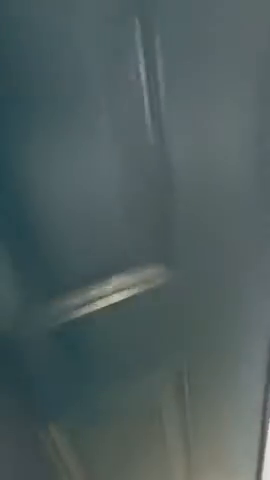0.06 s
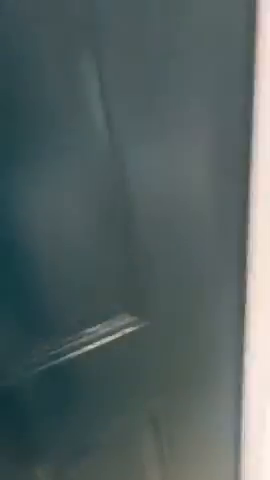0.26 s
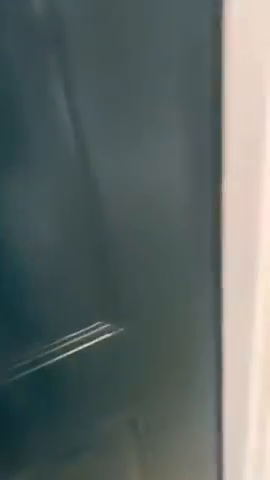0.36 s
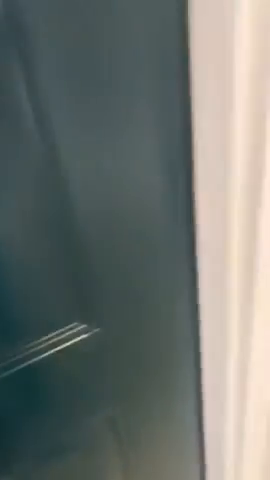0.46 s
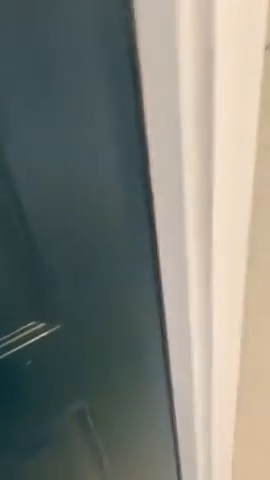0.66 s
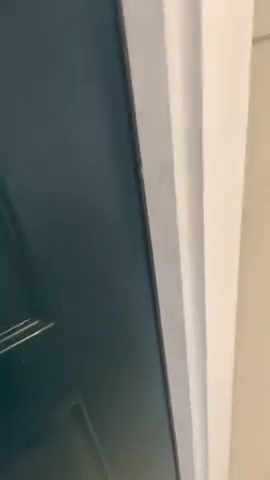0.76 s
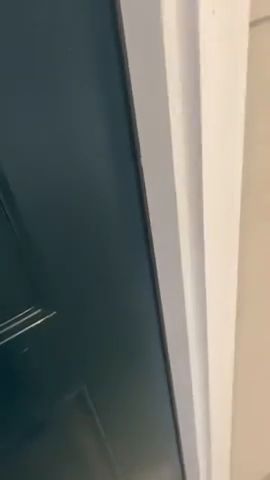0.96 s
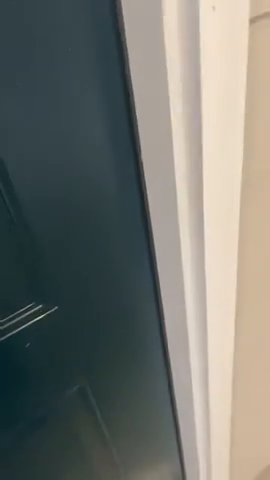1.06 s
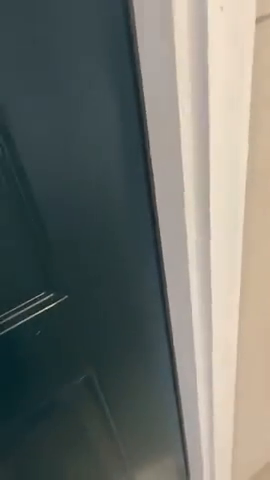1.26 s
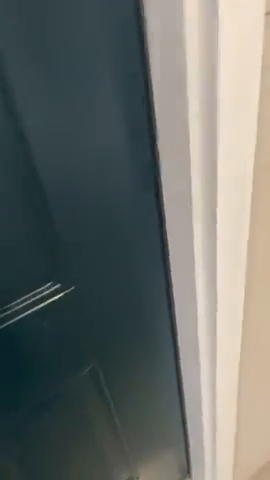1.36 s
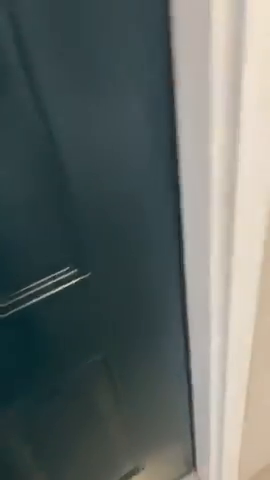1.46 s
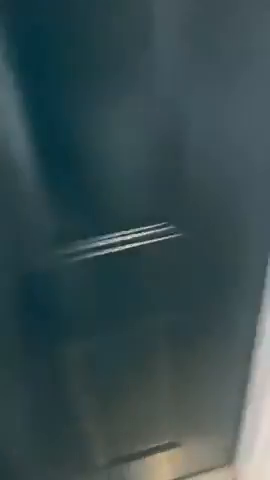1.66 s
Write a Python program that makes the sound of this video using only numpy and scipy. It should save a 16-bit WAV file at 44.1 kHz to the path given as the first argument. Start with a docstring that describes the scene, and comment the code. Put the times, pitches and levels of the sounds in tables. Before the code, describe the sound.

Knuckles rap a door five times, close to a mono microphone in an echoing hallway. Knocks fall at about 0.2, 0.36, 0.63, 0.77 and 1.04 seconds, uneven in spacing; the first is dullest, the last sharpest. Each has a boomy woody thud, a crack and a small metallic latch rattle. The ring fades over low, steady air noise, with faint soft bumps near 1.53 and 1.68.

```python
"""Five quick knuckle raps on an apartment door, heard from close by in a hallway.
Each rap sums noise bursts (tick, crack) with a filtered thud, its echoes and dying sines of the panel.
Longer, brighter noise bursts make the latch chatter; decaying noise makes the hallway ring on.
Behind them: two stretches of faint hiss, two soft sine bumps and steady shaped air noise."""
import sys
import numpy as np
from scipy import signal
from scipy.fft import rfft, irfft
from scipy.io import wavfile

SR = 44100
rng = np.random.default_rng(int(sys.argv[2]) if len(sys.argv) > 2 else 0)


def log_audio(samples):
    """Write samples as a 16-bit WAV file to the path given in sys.argv[1]."""
    # one column per channel
    frames = np.atleast_2d(samples).T
    # limit to full scale, then quantise
    limited = np.clip(frames, -1, 1)
    pcm = np.round(limited * 32767).astype(np.int16)
    wavfile.write(sys.argv[1], SR, pcm)


N = 74970


def amp(db):
    """Decibels to amplitude."""
    return 10 ** (np.asarray(db) / 20)


def read(points, hz):
    """A curve joined by straight lines over log frequency."""
    f, value = np.transpose(points)
    return np.interp(np.log(hz + 1), np.log(f + 1), value)


def unit(x):
    """Scales to energy 1."""
    return x / np.sqrt(np.sum(x ** 2) + 1e-20)


def add(mix, start_s, sound):
    """Mixes a sound in place, cut at the end of the mix."""
    part = mix[round(start_s * SR):][:len(sound)]
    part += sound[:len(part)]


def through(x, response):
    """Convolution cut to the scene's length."""
    return signal.fftconvolve(x, response)[:N]


def knocks():
    """Knuckles tick on the paint and crack on the door's skin; the whole panel follows."""
    # Each row: start in seconds, strength in dB, gain of crack and skin in dB, gain of tick in dB.
    blows = [(0.2064, -2.5, -14.5, 0), (.3615, .5, -1, -4), (0.6261, -.5, -2, -0.5),
             (0.7738, -2, -8.5, -3.5), (1.0374, 0, 2.5, 5)]
    # Each row: frequency in Hz, crack level in dB.
    crack_spectrum = [(200, -0.5), (500, 9.5), (750, -1.5), (950, -2), (1400, 2), (1900, -13), (2600, -23),
                      (4000, -32), (16000, -46)]
    # Each row: frequency in Hz, tick level in dB.
    tick_spectrum = [(500, 13), (1500, 11), (2400, 3.5), (3500, -9.5), (4400, -4), (7000, -14),
                     (10000, -20.5), (16000, -28)]
    crack_level_db, tick_level_db = 2.5, -12.5
    soft_hz, soft_share = 514, 0.36  # a soft knuckle wakes less of the panel above soft_hz

    out = np.zeros(N)
    body = panel()
    skin_ring = skin()
    lowpass = signal.butter(4, soft_hz, fs=SR, output="sos")
    low = signal.sosfiltfilt(lowpass, body)
    high = body - low
    for start_s, strength_db, crack_db, tick_db in blows:
        crack, tick = np.zeros((2, N))
        add(crack, 0, amp(crack_level_db) * burst(crack_spectrum, decay_s=0.016))
        add(tick, 0, burst(tick_spectrum, decay_s=0.055))
        crack_in_hall = hallway(crack, early_db=-4, late_db=-7)
        tick_in_hall = hallway(tick, early_db=4, late_db=1.5)
        add(out, start_s, amp(strength_db) * (low + amp(soft_share * crack_db) * high))
        add(out, start_s, amp(crack_db) * clack())
        add(out, start_s, amp(crack_db) * (skin_ring + crack_in_hall))
        add(out, start_s, amp(tick_level_db + tick_db) * tick_in_hall)
    return out


def burst(spectrum, decay_s):
    """Short impact: decaying noise forced to the spectrum, decayed again, softened by contact rise."""
    contact_s = 0.00044
    t = np.arange(SR // 10) / SR
    hz = np.fft.rfftfreq(len(t), 1 / SR)
    z = rfft(rng.standard_normal(len(t)) * amp(-60 * t / decay_s))
    phase = z / (abs(z) + 1e-9)
    shaped = irfft(phase * amp(read(spectrum, hz)), len(t))
    rise = 1 - np.exp(-(t / contact_s) ** 2)
    return unit(shaped * amp(-20 * t / decay_s) * rise)


def panel():
    """The door's answer to one blow: a thud, its echoes, the modes and a low boom."""
    # Each row: delay in seconds, signed share of the dulled thud.
    echoes = [(0.0093, 0.15), (0.0148, 0.072), (0.0189, 0.08), (0.0255, 0.17), (0.0281, 0.27),
              (0.0305, -0.16), (0.0426, 0.38), (0.052, -0.12), (0.0702, 0.14)]
    # Door modes. Each row: frequency in Hz, level in dB, T60 in seconds.
    door_modes = [(55.93, -21.5, 0.31), (77.3, -32, 0.57), (101, -20, 0.19), (118.8, -19.5, 0.18),
                  (137.7, -22.5, 0.34), (202.3, -19, 0.4), (232.1, -30.5, 0.63), (381, -24.5, 0.45),
                  (412.3, -33, 0.48), (512, -24.5, 0.24), (547, -31.5, 0.31), (645, -38, 0.44),
                  (761.6, -41, 0.41), (816.6, -29, 0.16)]
    # Hallway standing waves. Each row: frequency in Hz, level in dB, T60 in seconds.
    standing_waves = [(173.5, -30, 0.67), (220.3, -40.5, 1.18), (257.3, -36.5, 1.46), (269.4, -30.5, 0.73),
                      (292.8, -32, 0.98), (307.4, -37, 1.02), (320.8, -26.5, 0.67), (343.8, -29.5, 0.59)]
    # Each row: frequency in Hz, boom level in dB.
    boom_spectrum = [(50, -23), (150, -33), (220, -12), (300, -0.5), (400, 4), (480, 1.5), (700, -2.5),
                     (1000, -9), (2000, -42)]
    delay_s = 0.006  # blow to thud centre
    echo_cutoff_hz, boom_db = 600, 0

    pulse = thud(delay_s)
    dull = signal.sosfilt(signal.butter(1, echo_cutoff_hz, fs=SR, output="sos"), pulse)
    out = np.zeros(N)
    add(out, 0, pulse)
    for echo_s, share in echoes:
        add(out, echo_s, share * dull)
    modes = ring(door_modes, rise_s=0.0012) + ring(standing_waves, rise_s=0.028)
    add(out, delay_s, modes)
    boom = unit(through(tail(), colour(boom_spectrum)))
    add(out, delay_s, amp(boom_db) * boom)
    return out


def thud(delay_s):
    """The panel's first push: a zero-phase pulse of set spectrum under a Gaussian window."""
    # Each row: frequency in Hz, level in dB before windowing.
    thud_spectrum = [(40, -45), (110, -12), (200, 1), (300, 12.5), (450, -11.5), (680, 0.5), (950, -30.5),
                     (1400, -23), (2200, -62), (5000, -85)]
    peak_db, sigma_s = -2, 0.0063
    t = np.arange(SR // 10) / SR
    hz = np.fft.rfftfreq(len(t), 1 / SR)
    shift = np.exp(-2j * np.pi * hz * delay_s)
    pulse = irfft(amp(read(thud_spectrum, hz)) * shift, len(t))
    pulse *= np.exp(-((t - delay_s) / sigma_s) ** 2 / 2)
    pulse *= np.minimum(2 * t / delay_s, 1)
    return pulse * amp(peak_db) / abs(pulse).max()


def ring(modes, rise_s):
    """Exponentially dying sines with a common build-up."""
    t = np.arange(N) / SR
    rise = 1 - np.exp(-t / rise_s)
    return rise * sum(amp(db - 60 * t / t60_s) * np.cos(2 * np.pi * hz * t) for hz, db, t60_s in modes)


def skin():
    """Upper modes of the door's skin, louder under hard knuckles."""
    # Each row: frequency in Hz, level in dB, T60 in seconds.
    skin_modes = [(438.5, -36.5, 0.24), (607, -53, 0.15), (689.5, -42.5, 0.53), (764, -44, 0.38),
                  (1053.6, -34.5, 0.29), (1061, -37.5, 0.15), (1190, -39, 0.23), (1295, -44, 0.68),
                  (1327, -52, .45), (1328, -46.5, 1), (1455, -46, .45), (1564, -47, .3), (2650, -68, .4),
                  (4300, -52, 0.34)]
    return ring(skin_modes, rise_s=0.0042)


def clack():
    """A few cycles of the door's skin under a Gaussian, just after the contact."""
    hz, peak_db, delay_s, width_s = 1408, -17, 0.00525, 0.0018
    t = np.arange(SR // 20) / SR - delay_s
    return amp(peak_db) * np.exp(-(t / width_s) ** 2) * np.sin(2 * np.pi * hz * t)


def latch():
    """The bolt clacks against its plate as the door springs back."""
    # Each row: start in seconds, relative level in dB.
    rattles = [(0.2152, -8.5), (0.2415, -15), (0.2606, -12.5), (.3740, 1), (.3935, -20), (0.637, 0),
               (0.6561, -5), (0.683, -8.5), (0.7841, 0.5), (0.8333, -9.5), (1.0495, -10), (1.0730, -6)]
    # Each row: frequency in Hz, level in dB.
    latch_spectrum = [(600, -17), (2000, 4.5), (2900, 4), (3700, -3), (5000, -5), (6000, 4), (7200, 1),
                      (8500, -11), (11000, -18.5), (16000, -29)]
    level_db = -12
    out = np.zeros(N)
    for start_s, db in rattles:
        add(out, start_s, amp(level_db + db) * burst(latch_spectrum, decay_s=0.07))
    return hallway(out, early_db=-13, late_db=-5)


def hallway(x, early_db, late_db):
    """A sound with its quick scatter from the doorway and the long ring of the hallway."""
    early_t60_s, rise_s = 0.18, 0.0046
    t = np.arange(N) / SR
    rise = 1 - np.exp(-t / rise_s)
    early = unit(rng.standard_normal(N) * amp(-60 * t / early_t60_s) * rise)
    return x + through(x, amp(early_db) * early + amp(late_db) * tail())


def tail():
    """Diffuse reflections: random signs that build up, then die band by band."""
    # Each row: frequency in Hz, T60 in seconds.
    decay = [(60, 1), (150, 1), (290, 0.62), (500, 0.45), (900, 0.73), (1400, 0.92), (2500, 0.72),
             (6500, 0.46), (14000, 0.26)]
    rise_s = 0.0046
    hz, t, z = signal.stft(rng.choice([-1., 1.], N), SR, nperseg=256)
    t60_s = read(decay, hz)[:, None]
    x = signal.istft(z * amp(-60 * t / t60_s), SR, nperseg=256)[1][:N]
    return unit(x * (1 - np.exp(-np.arange(N) / SR / rise_s)))


def colour(spectrum):
    """Minimum-phase pulse: the most compact causal one with this spectrum."""
    hz = abs(np.fft.fftfreq(8192, 1 / SR))
    log_gain = np.log(amp(read(spectrum, hz)))
    response = np.exp(np.conj(signal.hilbert(log_gain)))
    return unit(np.fft.ifft(response).real[:len(log_gain) // 2])


def faint_hiss():
    """A faint band of filtered noise, raised around the first knock and again after the last."""
    # Each row: start in seconds, end in seconds, RMS level in dB.
    stretches = [(0, 0.336, -67), (1.244, 1.49, -66.5)]
    fade_in_s, fade_out_s = 0.0092, 0.03
    t = np.arange(N) / SR
    band = signal.butter(1, [3500, 10000], "bandpass", fs=SR, output="sos")
    hiss = signal.sosfilt(band, rng.standard_normal(N))
    level = np.zeros(N)
    for start_s, end_s, db in stretches:
        fade_in = np.clip((t - start_s) / fade_in_s, 0, 1)
        fade_out = np.clip((end_s - t) / fade_out_s, 0, 1)
        level += amp(db) * fade_in * fade_out
    return hiss / hiss.std() * level


def bumps():
    # Each row: centre in seconds, frequency in Hz, level in dB, 1/e half-width in seconds.
    soft_bumps = [(1.533, 675, -43.5, 0.0043), (1.680, 319, -41.5, 0.0065)]
    t = np.arange(N) / SR
    out = np.zeros(N)
    for centre_s, hz, db, width_s in soft_bumps:
        envelope = np.exp(-((t - centre_s) / width_s) ** 2)
        out += amp(db) * envelope * np.sin(2 * np.pi * hz * (t - centre_s))
    return out


def air():
    """Steady air noise of the building: white noise shaped in frequency."""
    # Each row: frequency in Hz, relative level in dB.
    air_spectrum = [(15, -60), (25, -12), (80, -1.5), (184, -6.5), (276, -4), (393, -9.5), (528, -16),
                    (638, -14.5), (1100, -7), (1250, -10), (1600, -11.5), (2970, -25.5), (15900, -44)]
    rms_db = -49
    gain = amp(read(air_spectrum, np.fft.rfftfreq(N, 1 / SR)))
    z = rfft(rng.standard_normal(N)) * gain
    return amp(rms_db) * np.sqrt(N) * unit(irfft(z, N))


def scene():
    """All sources summed to one channel."""
    return (knocks() + latch() + faint_hiss() + bumps() + air())[None]


def record(dry):
    """The microphone's bass roll-off, a soft knee on the highest peaks and the band limit."""
    knee, edge_hz = 0.73, 15600  # knee in full scale
    x = signal.sosfilt(signal.butter(5, 42, "highpass", fs=SR, output="sos"), dry)
    x = x / (1 + (x / knee) ** 6) ** (1 / 6)
    lowpass = signal.firwin(511, edge_hz, window=("kaiser", 9), fs=SR)
    return signal.oaconvolve(x, lowpass[None], "same")


dry = scene()
out = record(dry)
log_audio(out)
```